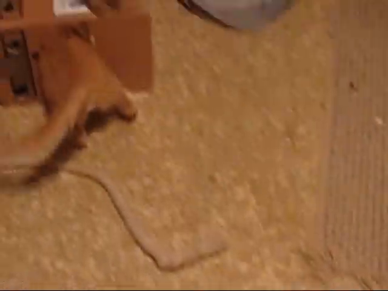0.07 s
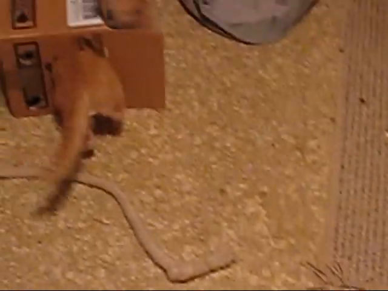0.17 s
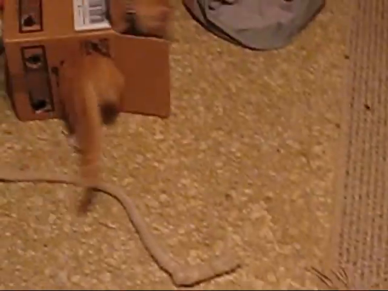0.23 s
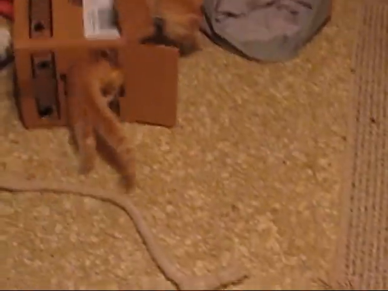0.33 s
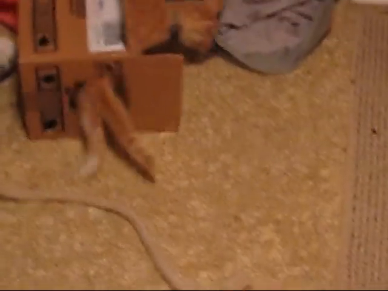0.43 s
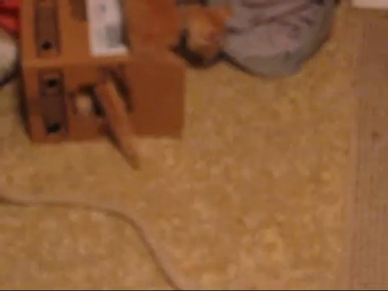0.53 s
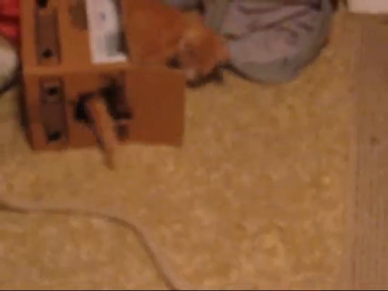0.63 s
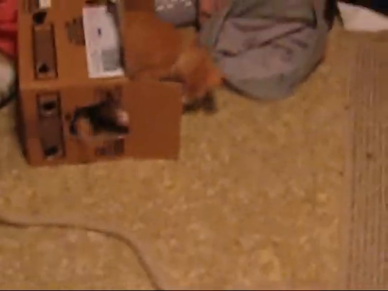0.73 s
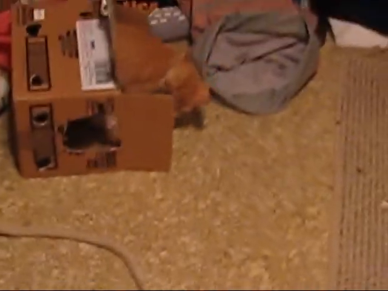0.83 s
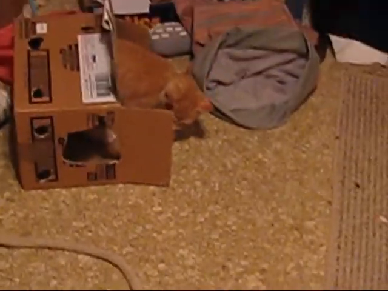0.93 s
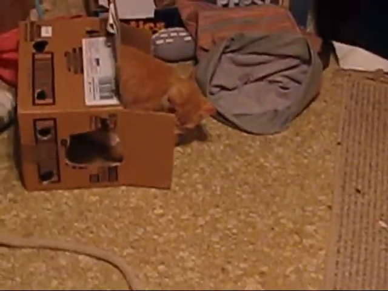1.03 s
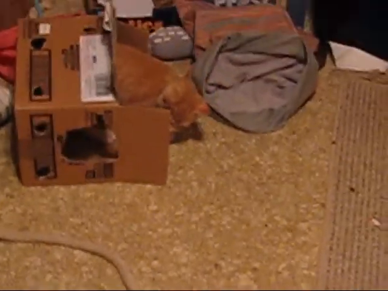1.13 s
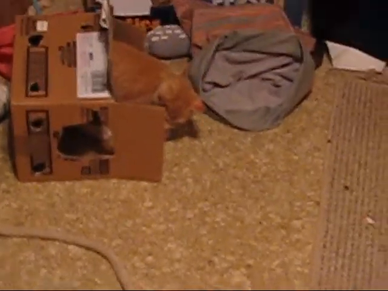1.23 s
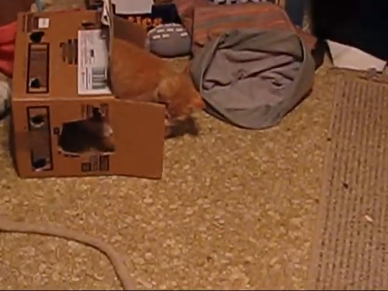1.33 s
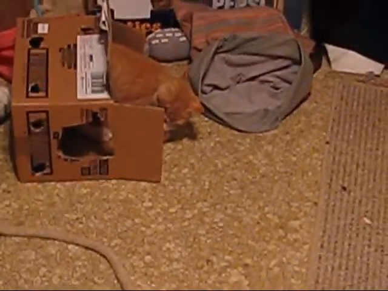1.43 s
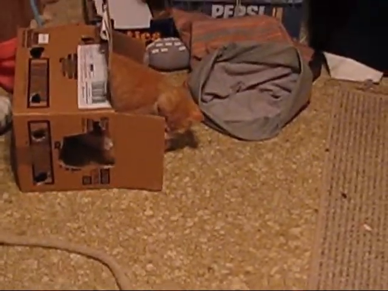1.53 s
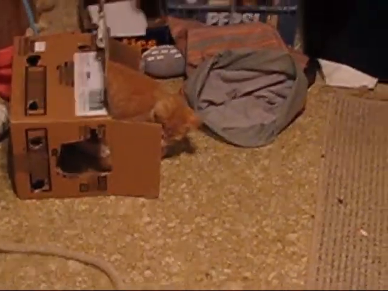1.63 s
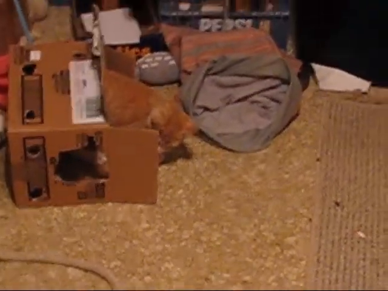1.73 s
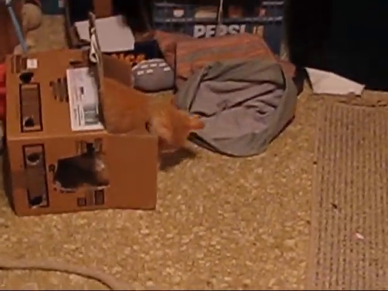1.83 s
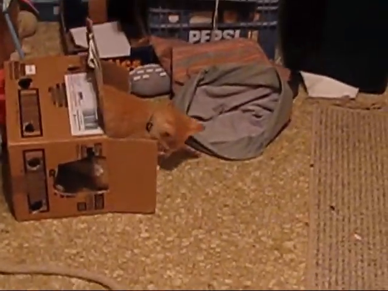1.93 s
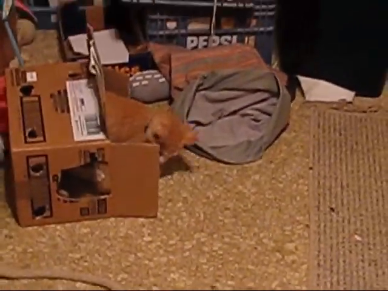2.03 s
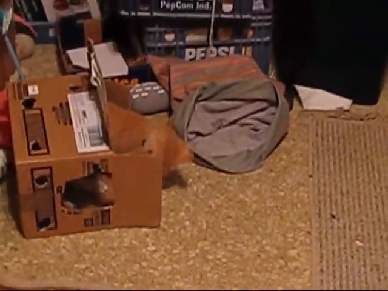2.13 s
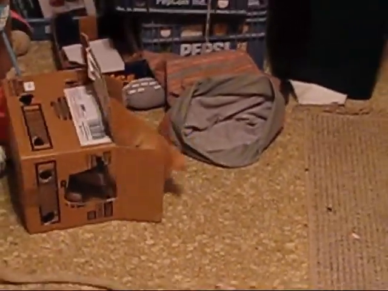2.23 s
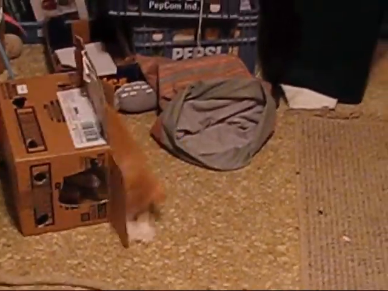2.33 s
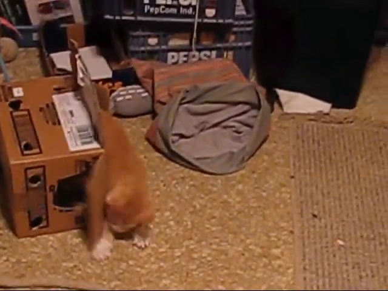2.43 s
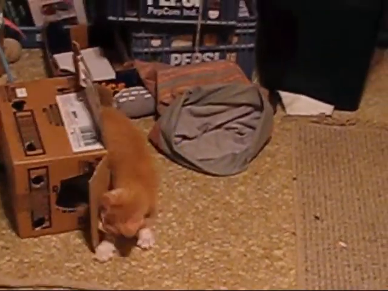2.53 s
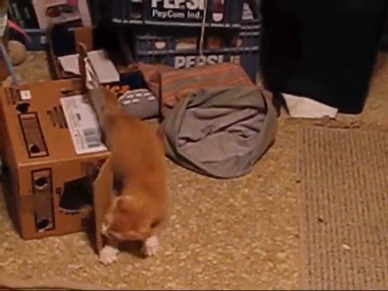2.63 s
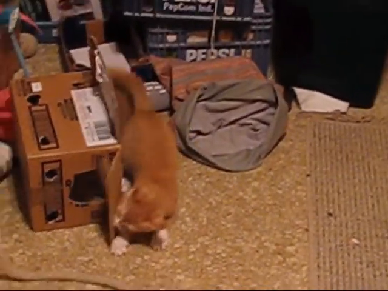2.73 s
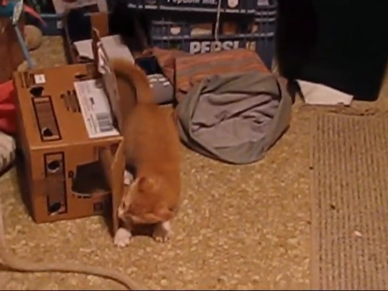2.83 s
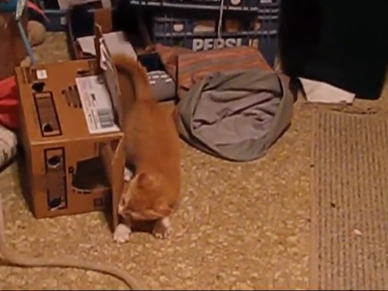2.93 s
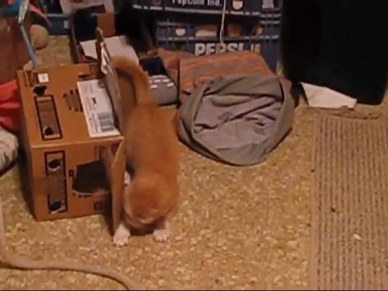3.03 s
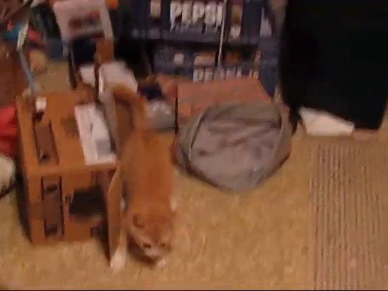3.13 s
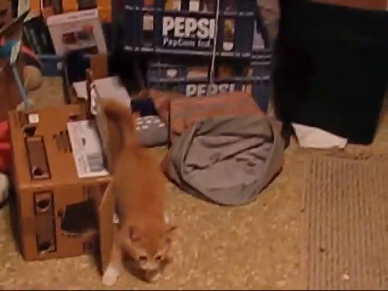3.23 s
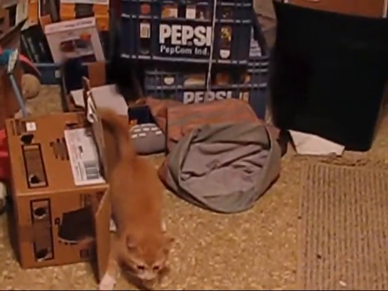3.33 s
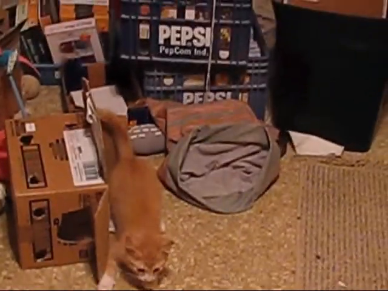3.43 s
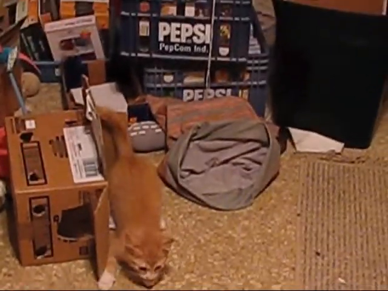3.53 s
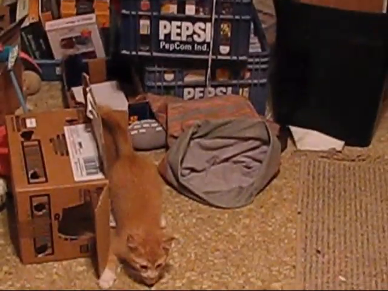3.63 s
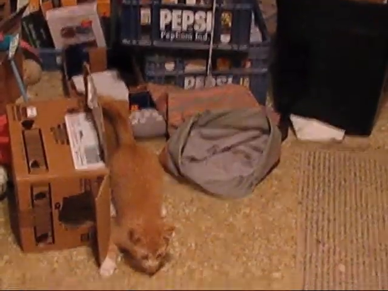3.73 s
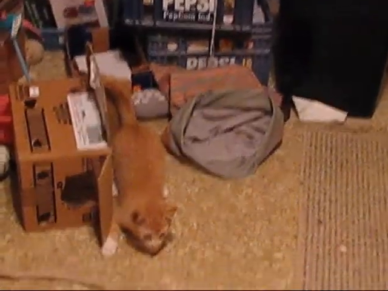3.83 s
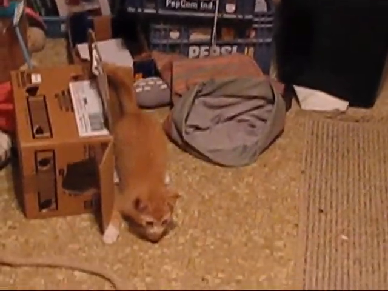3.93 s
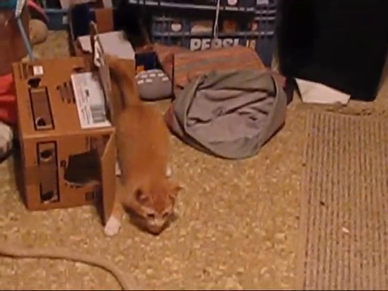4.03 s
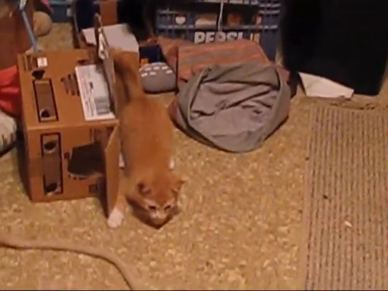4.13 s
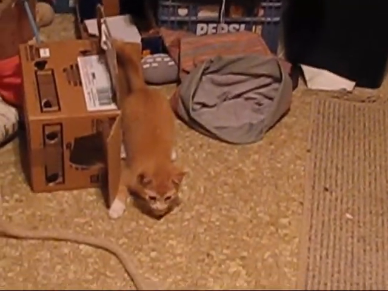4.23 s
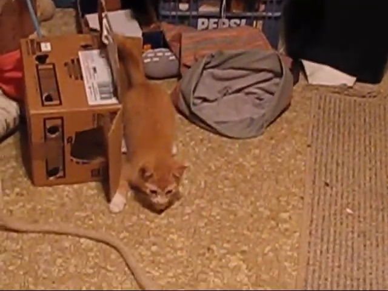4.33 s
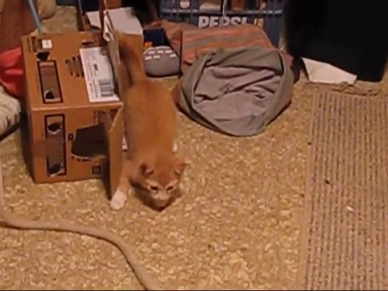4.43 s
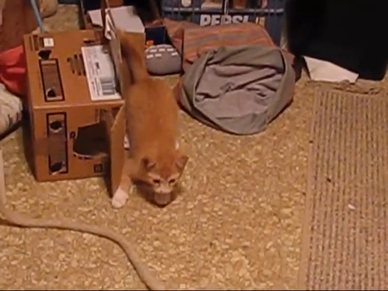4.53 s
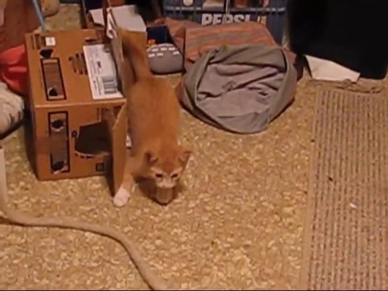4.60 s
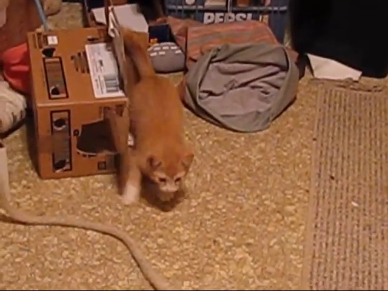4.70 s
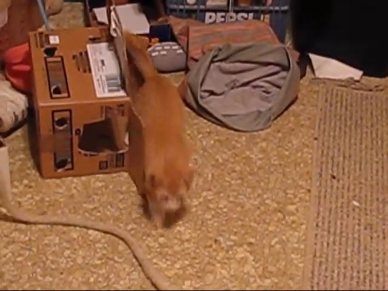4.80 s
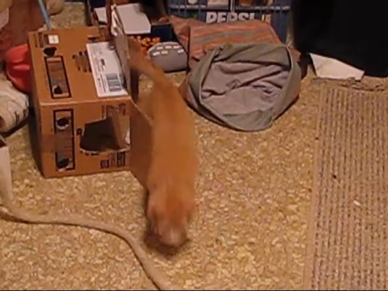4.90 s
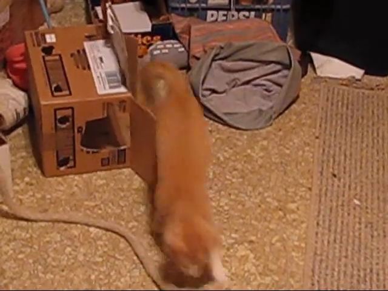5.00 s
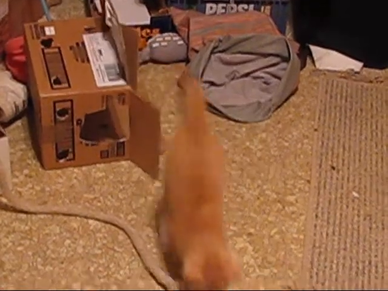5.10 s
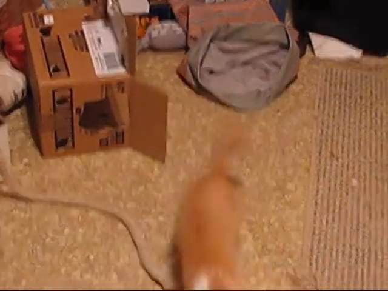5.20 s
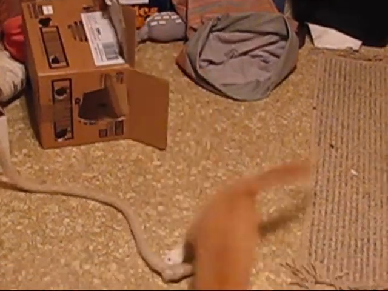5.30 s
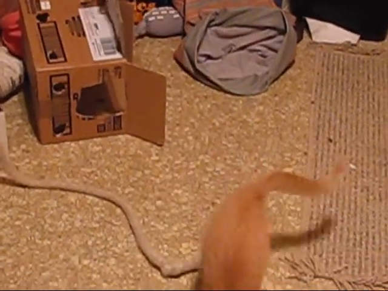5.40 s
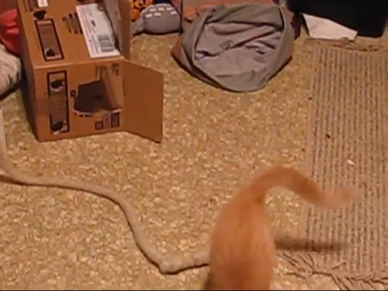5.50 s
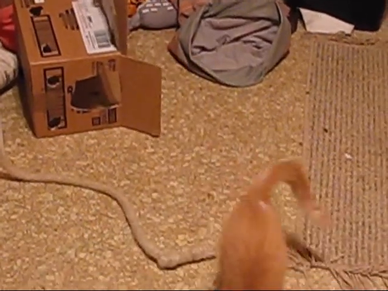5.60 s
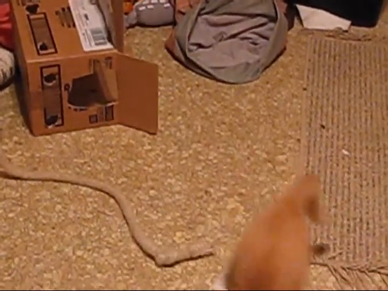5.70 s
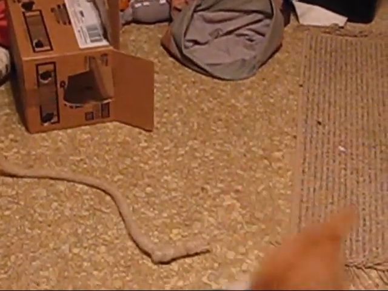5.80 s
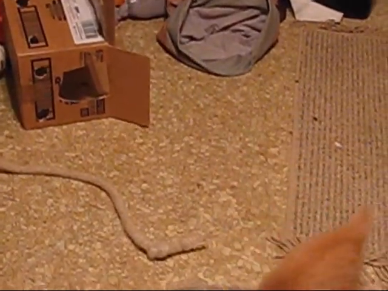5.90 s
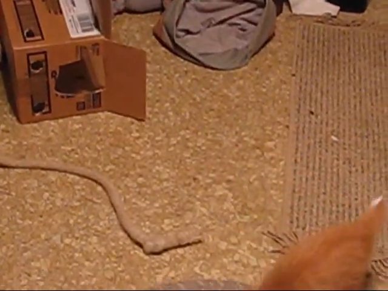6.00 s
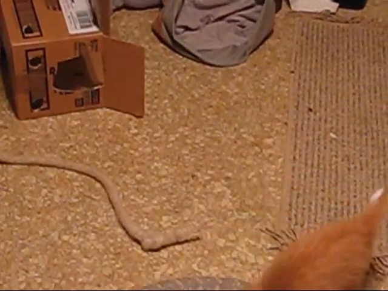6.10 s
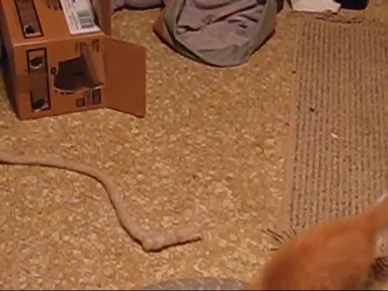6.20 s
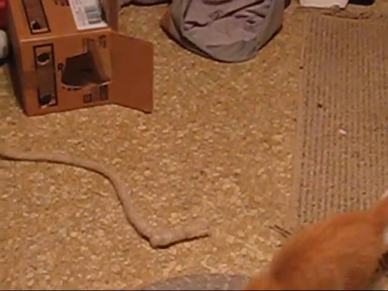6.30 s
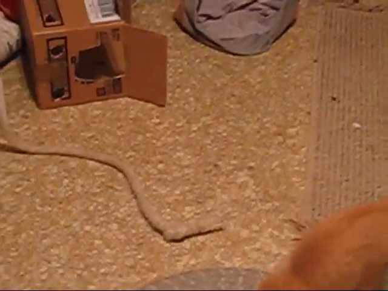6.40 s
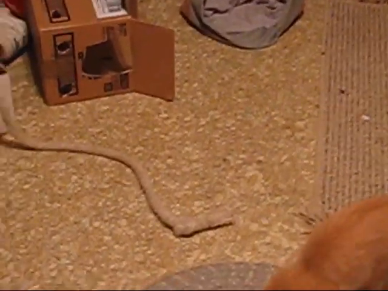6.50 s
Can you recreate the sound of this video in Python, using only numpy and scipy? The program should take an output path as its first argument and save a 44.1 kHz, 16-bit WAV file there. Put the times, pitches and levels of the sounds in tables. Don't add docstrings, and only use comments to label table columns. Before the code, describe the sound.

Close by, a kitten scrambles through a cardboard box: rough fur rubbing, scratching claws and hollow thumps. It quietens to faint ticks and taps, then the flap gives one very loud, sharp crack, followed by scrapes and snaps. After a lull with tiny steps, a light push-off and pounce set a small bell clinking weakly. A low motor hum and soft hiss continue throughout in a small, carpeted room, picked up by a simple camera microphone.

```python
import sys
import numpy as np
from scipy import signal
from scipy.fft import irfft
from scipy.io import wavfile
from scipy.ndimage import uniform_filter1d

SR = 44100
rng = np.random.default_rng(int(sys.argv[2]) if len(sys.argv) > 2 else 0)


def voltage_ratio(decibels):
    exponent = np.asarray(decibels, float) / 20
    return 10 ** exponent


def store_pcm(level_fs):
    pcm = np.round(np.clip(level_fs, -1, 1) * 32767).astype(np.int16)
    wavfile.write(sys.argv[1], SR, np.atleast_2d(pcm).T)


N = 288855
TIME = np.arange(N) / SR
BRIEF = np.arange(8000) / SR


def evened(x):
    return x / np.sqrt(np.mean(x ** 2) + 1e-20)


def peaked(x):
    return x / (abs(x).max() + 1e-12)


def sine(turns):
    return np.sin(2 * np.pi * turns)


def sides(pan_db):
    return voltage_ratio(np.array([[.5], [-.5]]) * pan_db)


def read(points, hz):
    f, value = np.transpose(points)
    return np.interp(np.log(hz + 1), np.log(f + 1), value)


def band(x, lo_hz, hi_hz, order=2):
    return signal.sosfilt(signal.butter(order, [lo_hz, hi_hz], "band", fs=SR, output="sos"), x)


def add(mix, s, sound, pan_db):
    part = mix[:, round(s * SR):][:, :len(sound)]
    part += sides(pan_db) * sound[:part.shape[1]]


def ring(modes, detune=0., size=8000):
    t = np.arange(size) / SR
    off = 1 + detune * rng.standard_normal(len(modes))
    return sum(voltage_ratio(db - 60 * t / t60) * sine(hz * k * t) for (hz, db, t60), k in zip(modes, off))


def slips(t60, spread_db, size=6000):
    uneven_db = spread_db * np.minimum(rng.exponential(1, size), 4) - 3.65 * spread_db
    run = rng.standard_normal(size) * voltage_ratio(uneven_db)
    run[0] = -1.57
    return run * voltage_ratio(-60 * np.arange(size) / SR / max(t60, .004))


# pitch_hz, level_db (per Hz)
AIR = [(12, -40), (24, -8.5), (130, -14), (330, -13), (730, -23), (1550, -24), (2900, -29), (12200, -40)]
# pitch_hz, coherence (0 to 1)
SAME = [(60, 0.24), (270, 0.53), (580, 0.85), (1230, 0.36), (2600, 0.0038), (5540, 0.9), (11800, 0.1)]
AIR_DB = -44.5


def air():
    frames, hz = N // 256 + 5, np.fft.rfftfreq(1024, 1 / SR)
    a, b, c, d, patches = rng.standard_normal((frames, 513, 5)).T
    patches = evened(uniform_filter1d(uniform_filter1d(patches, 12, 0), 14, 1))
    same = np.clip(read(SAME, hz), -1, 1)[:, None]
    left = a + 1j * b
    right = same * left + np.sqrt(1 - same ** 2) * (c + 1j * d)
    colour = voltage_ratio(read(AIR, hz)[:, None] + 1.3 * patches)
    hiss = signal.istft(np.array([left, right]) * colour, nperseg=1024, noverlap=768)[1][:, :N]
    return voltage_ratio(AIR_DB) * hiss / np.std(band(hiss, 265, 11000))


# start_s, level_db
HUM = [(0.0, -35.5), (1.26, -36.5), (2.1, -36.5), (2.44, -41), (2.74, -37.5), (5.07, -38.5), (5.27, -40.5),
       (6.55, -38)]
# multiple, level_db
HUM_ORDERS = [(2, -47.5), (4, -49), (8, -60.5), (15, -71), (22, -68.5), (24, -69), (26, -61.5), (28, -63.5),
              (30, -67.5), (32, -73), (40, -105)]
# pitch_hz, level_db, width_hz
FAN = [(91.5, -48, 0.54), (183.8, -44.5, 3.96), (257.5, -55, 4)]
HUM_HZ, HUM_PAN_DB_PER_ORDER = 58.97, 0.0834
WHINE_HZ, WHINE_DB, FLIPS_PER_S = 7867.1, -61.5, 29.97


def machines():
    turns = HUM_HZ * TIME
    hum = voltage_ratio(np.interp(TIME, *np.transpose(HUM))) * sine(turns)
    for k, db in HUM_ORDERS:
        hum = hum + voltage_ratio(db) * sides(k * HUM_PAN_DB_PER_ORDER) * sine(k * turns + rng.random())
    flips = np.clip(8 * np.sin(np.pi * (FLIPS_PER_S * TIME + 0.4)), -1, 1)
    whine = voltage_ratio(WHINE_DB) * flips * sine(WHINE_HZ * TIME)
    fan = np.zeros(N)
    for hz, db, width_hz in FAN:
        drift = np.cumsum(rng.standard_normal(N)) / np.sqrt(SR)
        fan += voltage_ratio(db) * np.sin(2 * np.pi * hz * TIME + np.sqrt(2 * np.pi * width_hz) * drift)
    return np.sqrt(2) * (hum + whine + fan)


# pitch_hz, level_db, width_hz
DUCT = [(75.4, -51.5, 29), (167, -55.5, 18), (217.3, -60, 4.1), (272.3, -57.5, 10.5)]


def duct():
    hz = np.fft.rfftfreq(N, 1 / SR)
    a, b = rng.standard_normal((len(hz), 2)).T
    noise = a + 1j * b
    return sum(voltage_ratio(db) * evened(irfft(noise / (1 + ((hz - f) / width) ** 2), N)) for f, db, width in DUCT)


# pitch_hz, level_db (per Hz)
FUR = [(300, -6), (900, -7.5), (1500, -5), (2400, -3), (3300, -12), (4500, -14.5), (7500, -18),
       (12500, -20.5)]
# pitch_hz, level_db
WALLS = [(325, -1.5), (410, 0.5), (490, -4), (600, -3.5), (700, -6.5), (830, -12), (970, -7), (1130, -18)]


def rubbing():
    clumps = evened(uniform_filter1d(rng.standard_normal(N), 260))
    burst_db = 2.9 * np.minimum(rng.exponential(1, N), 5) + 1.54 * clumps
    crackle = rng.standard_normal((2, N)) * voltage_ratio(burst_db)
    crackle[1] = .68 * crackle[0] + .73 * crackle[1]
    hz, _, z = signal.stft(crackle, SR, nperseg=512)
    patches = uniform_filter1d(rng.standard_normal(z.shape[1:]), size=8, axis=0)
    patches = evened(uniform_filter1d(patches, size=5, axis=1))
    colour = voltage_ratio(read(FUR, hz)[:, None] + 2.4 * patches)
    fur = signal.istft(z * colour, SR, nperseg=512)[1][:, :N]
    panels = ring([(hz, db, .05) for hz, db in WALLS], size=3000)
    body = evened(band(signal.oaconvolve(crackle, panels[None])[:, :N], 275, 1150))
    return evened(band(fur, 1000, 4400)), -evened(band(fur, 4400, 13000)), body


# start_s, level_db
SHIFTING = [
    [(0.0, -37), (0.338, -42.5), (0.536, -50), (0.762, -36), (1.0, -63)],
    [(1.04, -48.5), (1.57, -52.5), (1.8, -53)],
    [(2.25, -52), (2.486, -44.5), (2.616, -41), (2.768, -41), (2.85, -51)],
    [(4.85, -64), (5.028, -64), (5.186, -49), (5.322, -62), (5.7, -46.5)],
]
# middle_s, level_db, length_s, body_db
SWEEPS = [(0.038, -47.5, 0.13, 6.5), (0.109, -39, 0.024, -24), (0.194, -51, 0.081, -8),
          (0.268, -47.5, 0.044, -22), (0.316, -45, 0.04, -20), (0.386, -40.5, 0.11, 1),
          (0.773, -46.5, 0.063, -22), (0.919, -47.5, 0.084, 3.5), (2.3, -41, 0.084, -0.5),
          (2.346, -42.5, 0.053, 5), (2.524, -48, 0.046, -2), (2.579, -45.5, 0.065, -12),
          (3.16, -57, 0.21, 10), (4.963, -45, 0.039, 1), (5.008, -36.5, 0.051, -4),
          (5.054, -51.5, 0.043, -4), (5.62, -53, 0.02, -15)]
# middle_s, level_db, length_s, body_db
RUBS = [(0.436, -50.5, 0.066, 15), (0.528, -45, 0.058, 11), (1.265, -50.5, 0.042, 6),
        (2.423, -46.5, 0.099, -24), (2.656, -44, 0.069, -14), (2.695, -29.5, 0.037, -7.5),
        (2.744, -39, 0.03, -1), (4.893, -39.5, 0.057, -6), (5.318, -45.5, 0.024, 8.5),
        (5.356, -50, 0.055, -12)]
# middle_s, level_db, length_s, body_db
WISPS = [(0.605, -55, 0.019, -8), (0.879, -56, 0.019, -7), (1.663, -60, 0.074, 5), (4.813, -58, 0.021, -5),
         (5.103, -65, 0.067, 21)]
SWEEP_TREBLE_DB, RUB_TREBLE_DB, WISP_TREBLE_DB = 1, -8.5, 12


def brushing():
    mid, treble, body = rubbing()
    out = np.zeros((2, N))
    for bout in SHIFTING:
        s, db = np.transpose(bout)
        on = np.interp(TIME, [s[0] - .01, s[0], s[-1], s[-1] + 0.03], [0, 1, 1, 0])
        level = on * voltage_ratio(np.interp(TIME, s, db) - 15.5)
        out += level * (mid + voltage_ratio(9.0) * treble + voltage_ratio(5.0) * body)
    kinds = (SWEEPS, SWEEP_TREBLE_DB), (RUBS, RUB_TREBLE_DB), (WISPS, WISP_TREBLE_DB)
    for strokes, treble_db in kinds:
        for s, db, length, body_db in strokes:
            a, b = max(round((s - 0.45 * length) * SR), 0), round((s + 0.99 * length) * SR)
            swell = np.sin(np.pi * np.linspace(0, 1, b - a) ** 0.71)
            stroke = mid[:, a:b] + voltage_ratio(treble_db) * treble[:, a:b] + voltage_ratio(body_db) * body[:, a:b]
            out[:, a:b] += swell * voltage_ratio(db) * stroke
    return out


# start_s, peak_db, ring_hz, treble_db, t60_s
CLAWS = [(0.0344, -27.5, 1600, 1.5, 0.24), (0.1018, -15, 2300, 1, 0.021), (0.1824, -18.5, 5980, -5, 0.067),
         (0.307, -29.5, 2540, 5, 0.25), (0.348, -23, 1930, -20, 0.11), (0.424, -18.5, 2220, -1, 0.024),
         (0.508, -17.5, 2300, -2.5, 0.14), (0.527, -24, 1550, 4.5, 0.069), (0.542, -30, 2600, -20, 0.023),
         (0.7543, -27.5, 2090, 0, 0.07), (2.256, -29.5, 1660, 2.5, 0.045), (2.354, -32, 2200, 5, 0.037),
         (2.447, -22.5, 2010, -28, 0.041), (2.5612, -26, 2560, -17, 0.028), (2.5755, -23, 1940, -20, 0.058),
         (2.682, -17, 2120, -3, 0.042), (2.693, -21, 2830, 2, 0.085), (2.7356, -15.5, 2820, -2.5, 0.065),
         (2.741, -20, 2140, -25, 0.13), (4.8866, -51, 1430, -26, 0.054), (5.007, -25, 3100, 7, 0.048),
         (5.015, -24, 2830, -28, 0.088)]
# start_s, peak_db, ring_hz, treble_db
TICKS = [(0.37, -35, 2570, 11), (1.0846, -24.5, 2600, -42), (1.3, -29, 1930, -25), (1.3258, -33, 1870, -19),
         (1.3704, -33, 2350, -42), (1.394, -32, 1900, -22), (1.614, -32, 1690, -41),
         (1.6643, -27.5, 2020, -20), (1.6847, -48, 1870, -20), (1.7014, -51, 1900, -12),
         (1.719, -42, 2500, -15), (2.469, -30.5, 1930, 5.5), (3.217, -48, 1520, -9),
         (4.1733, -31, 2070, -25), (5.3054, -32, 2840, -2), (5.3168, -27, 1470, -6),
         (5.363, -35.5, 2510, -4), (5.365, -33, 1750, -19), (5.603, -36, 3500, -10), (5.623, -37, 1500, 9),
         (5.625, -30, 3000, -3), (5.638, -35, 3300, -10), (6.328, -34, 1770, -3)]
CLAW_PAN_DB = -2.5
TICK_T60_S, PAN_PER_TREBLE_DB = .014, 0.2663


def claws():
    out = np.zeros((2, N))
    catches = [(*row, CLAW_PAN_DB) for row in CLAWS]
    ticks = [(*row, TICK_T60_S, CLAW_PAN_DB + PAN_PER_TREBLE_DB * (row[-1] + 10)) for row in TICKS]
    for rows, ringing, width in ((catches, .9, .06), (ticks, 1.3, .1)):
        for s, db, hz, treble_db, t60, pan_db in rows:
            run = slips(t60, spread_db=5.0)
            resonance = peaked(band(run, (1 - width) * hz, (1 + width) * hz, order=1))
            card = peaked(band(run, 850, 5260, order=4)) + ringing * resonance
            scratch = peaked(card) - voltage_ratio(treble_db) * peaked(band(run, 5200, 12900))
            add(out, s + 0.001001, voltage_ratio(db) * scratch, pan_db)
    return out


# start_s, peak_db, pitch_hz, t60_s
BOOMS = [(0.099, -23.5, 182, 0.05), (0.421, -22, 197, 0.1), (0.537, -17.5, 194, 0.18),
         (0.594, -27, 125.6, 0.15), (2.329, -15, 181, 0.11)]


def booms():
    out = np.zeros((2, N))
    for s, db, hz, t60 in BOOMS:
        boom = np.minimum(BRIEF / 0.0029, 1) * ring([(hz, 0, t60), (0.83 * hz, -8, t60)])
        add(out, s, -voltage_ratio(db) * boom, 0)
    return out


# start_s, peak_db, ring_hz, pan_db
KNOCKS = [(0.104, -30, 440, 0), (0.426, -34, 390, 2), (0.428, -37, 371, -0.5), (0.51, -18.5, 288, -10),
          (0.526, -23.5, 405, -4), (0.601, -24.5, 326, -1), (0.606, -25, 337, -1), (0.793, -31.5, 330, -11),
          (0.906, -26, 292, -8), (1.086, -32, 277, -9), (1.325, -35, 327, -11), (1.372, -30.5, 343, -10),
          (1.4, -30, 330, -7), (1.615, -27, 329, 1), (1.69, -33, 330, -14.5), (2.332, -14, 300, -0.5),
          (2.342, -19, 482, 0), (2.345, -21, 796, 0), (2.362, -31, 403, -4), (2.444, -29, 407, -4),
          (5.348, -31, 416, -4), (6.459, -37, 310, -1)]
# start_s, peak_db, ring_hz, pan_db
TAPS = [(1.088, -31, 915, 8), (1.301, -31.5, 874, -17), (1.326, -48, 850, -4), (1.372, -27.5, 710, 12),
        (1.618, -30, 976, -19.5), (1.627, -36.5, 810, 13), (1.668, -31, 1030, -9), (1.688, -33, 905, -16),
        (1.701, -32, 816, 16), (1.722, -36.5, 1024, -16), (3.177, -46.5, 2050, -4), (3.216, -36, 1520, -10),
        (4.884, -26, 690, 5), (4.8861, -19, 969, 3), (5.259, -36.5, 1070, -17), (5.320, -33, 1250, -14),
        (5.616, -36, 1160, -10), (6.458, -40, 820, -10)]
# pitch_hz, level_db, t60_s
BOX = [(194, -31.5, 0.029), (463, -32, 0.011), (780, -22, 0.11), (969, 14, 0.031), (2310, -33, 0.22),
       (3000, -40.5, 0.17)]
KNOCK_T60_S, TAP_T60_S, PRESS_PER_DB = 0.066, 0.061, 0.3


def knocks():
    out = np.zeros((2, N))
    blows = [(*row, KNOCK_T60_S * max(0.5 - PRESS_PER_DB * (row[1] + 25), .3)) for row in KNOCKS]
    blows += [(*row, TAP_T60_S) for row in TAPS]
    for s, db, hz, pan_db, t60 in blows:
        neighbours = [(k * hz, -3, .8 * t60 / k ** .5) for k in (.55, .75, 1.25, 1.55, 1.9)]
        panels = ring([(hz, 0, t60)] + neighbours, .05) + voltage_ratio(-14) * ring(BOX, 0.067)
        blow = signal.oaconvolve(slips(0.22 * t60, spread_db=6.0, size=2000), panels)
        add(out, s + 0.00101, voltage_ratio(db) * peaked(band(blow, 0.5 * hz, 2.0 * hz)), pan_db)
    return out


# start_s, peak_db, pitch_hz, direction (of the push), pan_db
SNAPS = [(0.105, -19, 400, 1, 0), (0.4222, -13, 450, 1, -2), (0.5983, -14, 400, -1, 0),
         (1.0866, -25, 1800, -1, -6), (1.3277, -26, 800, 1, -6), (1.3719, -22, 2200, -1, -8),
         (1.6149, -21, 2400, 1, -10), (1.6285, -26, 900, 1, -8), (1.687, -27, 1300, 1, -10),
         (1.72, -23, 800, 1, -10), (2.6838, -15, 2200, 1, -4), (2.7378, -14, 2400, -1, -4),
         (3.1788, -31, 1500, 1, -5), (4.885, -25, 1500, 1, 0), (5.614, -23, 650, 1, -6),
         (6.459, -26, 480, -1, -6)]
SNAP_LOSS_DB_PER_TURN = 11


def snaps():
    out, t = np.zeros((2, N)), np.arange(2000) / SR
    for s, db, hz, way, pan_db in SNAPS:
        decay = voltage_ratio(db - SNAP_LOSS_DB_PER_TURN * (t * hz - .25))
        add(out, s, np.sign(way) * decay * sine(hz * t), pan_db)
    return out


# start_s, peak_db, pitch_hz, held_s, pan_db
WOBBLES = [(0.351, -29, 455, 0.03, -4), (0.4584, -16.5, 170.5, 0.027, 3), (2.67, -22.5, 416, 0.0036, 8),
           (2.677, -20, 400, 0.008, 4), (0.601, -26, 335, 0.0065, 0), (1.6647, -17, 880, 0.001, -10),
           (2.336, -11, 315, 0.0021, 0), (5.3172, -20, 1040, 0.0074, -7.5),
           (5.318, -26.5, 1316, 0.0055, -15)]


def wobbles():
    out, t = np.zeros((2, N)), BRIEF
    for s, db, hz, held, pan_db in WOBBLES:
        stopped = voltage_ratio(-5 * t / held - 16 * np.maximum(t - held, 0) * hz / 2)
        add(out, s, -voltage_ratio(db) * np.minimum(t * hz * 2, 1) * stopped * sine(hz * t), pan_db)
    return out


# start_s, peak_db, pitch_hz, t60_s, pan_db
RINGS = [(0.432, -27, 707, 0.056, -1), (0.442, -33, 1010, 0.082, 0), (0.53, -21, 645, 0.05, -1),
         (0.543, -30, 2430, .012, -3), (0.428, -23, 2400, 0.028, -7), (0.511, -23.5, 1226, 0.042, -2),
         (0.525, -29, 1570, 0.063, 0), (0.519, -20.5, 459, 0.15, 0.5), (0.603, -24, 445, 0.093, 0),
         (0.604, -28, 620, 0.081, 0), (1.6155, -29.5, 2600, 0.021, -12), (4.171, -41, 2220, 0.04, -3),
         (2.3275, -18.5, 2250, 0.026, -15), (2.385, -32, 258, 0.055, 0), (2.342, -25, 410, 0.045, 0),
         (2.351, -21, 530, 0.046, 0), (2.345, -31, 830, 0.05, -2), (2.347, -27, 3060, 0.044, -4),
         (2.358, -23, 817, 0.043, -3), (2.358, -18, 194, 0.11, 3), (2.683, -21, 2130, 0.057, -4),
         (2.683, -24, 3400, .04, -9), (2.696, -27, 2815, 0.1, -14), (2.698, -27, 3560, 0.099, -6),
         (2.697, -38, 2150, .07, -4), (2.705, -29, 1364, 0.11, -2), (2.738, -19.5, 2110, 0.099, -2),
         (2.739, -22, 2770, 0.037, -7), (2.739, -29, 1660, 0.091, 1), (2.738, -32, 3900, .05, 1),
         (4.889, -37, 2060, 0.033, -9), (4.896, -28, 976, 0.037, -4.5), (5.006, -29, 3220, 0.047, -13),
         (5.015, -30, 2820, 0.08, -9), (5.016, -26, 1660, 0.053, -2), (5.038, -37, 1780, .04, -3),
         (5.3172, -14, 640, 0.016, -8), (5.326, -37, 1020, 0.045, -10), (5.349, -37, 650, 0.035, -1),
         (5.625, -36, 2200, .015, -4)]
# start_s, peak_db, pitch_hz, t60_s, pan_db
MORE_RINGS = [(0.42, -28, 724, 0.12, 0), (0.421, -30, 955, 0.054, 0), (0.518, -24, 660, 0.045, 0),
              (0.599, -22, 101, .12, 0), (0.628, -28, 100, 0.11, 0), (0.622, -28, 412, .12, 0),
              (2.329, -17, 754, .04, -4), (2.331, -9.5, 377, 0.073, 0), (2.343, -27, 1050, .06, -2),
              (2.347, -20, 493, .05, 0), (2.683, -26, 1500, 0.026, 0), (2.7, -31, 1980, .03, -4),
              (2.704, -29, 2760, 0.036, -6), (2.71, -24, 1770, .05, -4), (2.7347, -21, 2620, .02, -4),
              (2.742, -20, 2680, 0.024, -5), (2.741, -23, 3180, .02, -4), (2.747, -28, 1645, 0.053, 0),
              (3.06, -32, 880, 0.018, -1), (3.136, -33, 1050, .015, -3), (3.178, -29, 1240, 0.017, -11),
              (3.188, -36, 1120, 0.032, -13), (3.2165, -32, 1020, 0.018, -8), (3.217, -39, 2350, .012, -3),
              (3.27, -36, 1100, .02, -2), (3.274, -36, 1700, .015, 0), (3.276, -42, 2400, .012, -2),
              (3.47, -37, 888, .02, 0)]
RING_RISE_TURNS = 1.5


def rings():
    out, t = np.zeros((2, N)), BRIEF
    for s, db, hz, t60, pan_db in RINGS + MORE_RINGS:
        rise = np.minimum(t * hz / RING_RISE_TURNS, 1)
        add(out, s, voltage_ratio(db - 60 * t / t60) * rise * sine(hz * t), pan_db)
    return out


# start_s, peak_db, crack_hz, t60_s
FLAP = [
    (2.3284, 3.5, 2500, .006),
]


def flap():
    out = np.zeros((2, N))
    push_samples = 18
    for s, db, hz, t60 in FLAP:
        push = np.pad(-np.linspace(0, 1, push_samples) ** 1.6, (0, 8000 - push_samples))
        crack = [(hz, -7.5, t60), (1.5 * hz, -18, t60), (1.95 * hz, -19, t60)]
        crack += [(3 * hz, -13, t60), (4 * hz, -13, t60)]
        thud = [(560, -10.5, .012), (330, -20, .012)]
        rebound = np.roll(ring(crack + thud), push_samples)
        panels = np.roll(peaked(ring(BOX)), 60)
        add(out, s, voltage_ratio(db) * (uniform_filter1d(push + rebound, size=4) + voltage_ratio(-21.0) * panels), 0)
    return out


# start_s, peak_db
BELL_HITS = [(5.129, -42), (5.1382, -32), (5.1479, -28), (5.257, -46), (5.2694, -44), (5.2862, -34.5),
             (5.3083, -36), (5.342, -33.5), (5.359, -40), (5.3852, -51), (5.416, -46), (5.9427, -45.5),
             (5.964, -53), (5.9874, -52), (6.0307, -57), (6.1644, -53), (6.1689, -53)]
# pitch_hz, level_db, t60_s
BELL = [(5287, -1, .15), (5329, 0, .16), (5395, -4, .09)]


def bell():
    out, t = np.zeros((2, N)), BRIEF
    gaps = np.diff([s for s, _ in BELL_HITS] + [N / SR])
    for (s, db), gap in zip(BELL_HITS, gaps):
        lags = (rng.uniform(2.3, 2.9), 0, rng.uniform(0, 6))
        shell = np.zeros(len(t))
        for (hz, mode_db, t60), lag in zip(BELL, lags):
            shell += voltage_ratio(mode_db - 60 * t / t60) * np.sin(2 * np.pi * hz * t + lag)
        stilled = voltage_ratio(-1500 * np.maximum(t - min(gap - .005, .045), 0))
        clink = peaked(band(slips(.022, spread_db=5, size=8000), 5050, 6200))
        add(out, s, voltage_ratio(db) * (peaked(shell) * stilled + voltage_ratio(-5.5) * clink), -7)
    return out


def room(x, t60=0.26):
    taps = np.zeros((2, 16000))
    at = np.arange(120, 15980, 20) + rng.integers(0, 20, (2, 793))
    np.put_along_axis(taps, at, rng.choice([-1., 1.], at.shape), 1)
    hz, t, z = signal.stft(taps, SR, nperseg=256)
    decay = voltage_ratio(-60 * t / (t60 * (1 + hz[:, None] / 3000) ** -.3))
    tail = signal.istft(z * decay, SR, nperseg=256)[1]
    return signal.fftconvolve(x.mean(0)[None], tail / np.linalg.norm(tail[0]), axes=1)[:, :N]


def scene():
    near = brushing() + claws() + booms() + knocks() + snaps() + wobbles() + rings() + flap() + bell()
    near = np.array([near[0], np.roll(near[1], shift=1)])
    return near + voltage_ratio(-13.0) * room(near) + sides(0.8) * machines() + air() + duct()


def within(spans):
    return uniform_filter1d(sum((TIME > a) * (TIME < b) * 1. for a, b in spans), 500)


def roll_off(x):
    return signal.sosfilt(signal.butter(12, 12370, fs=SR, output="sos"), x)


# start_s, end_s
WIDE = [(1.07, 1.1), (2.38, 2.46), (3.77, 3.85), (5.35, 5.38), (6.51, 6.55)]
# pitch_hz, level_db
KEPT = [(130, -8), (350, -5), (1300, -14), (4050, -30), (4150, 0), (5200, 0), (5330, -5), (5500, 5)]
# start_s, end_s
BASS_WIDE = [(.06, .13), (.26, .38), (.47, .53), (.95, 1.48), (1.55, 1.78), (3.18, 3.26), (5.05, 5.5),
             (5.57, 5.75), (6.38, 6.55)]
EARLY_EDGE_HZ, LATE_EDGE_HZ = 11750, 12200


def record(dry):
    total, difference = dry[0] + dry[1], dry[0] - dry[1]
    hz, t, (m, s) = signal.stft([total, difference], SR, nperseg=2048)
    edges = np.r_[0:40:4, 40:1024:8]
    m_power, s_power = [
        np.add.reduceat(uniform_filter1d(abs(z[:-1]) ** 2, size=2, axis=1), edges) for z in (m, s)]
    strong = s_power > m_power * voltage_ratio(2 * read(KEPT, hz[edges + 2]))[:, None]
    strong = np.repeat(strong, np.diff(np.r_[edges, 1024]), axis=0)
    kept = np.pad(strong, ((0, 1), (0, 0))) | (np.interp(t, TIME, within(WIDE)) > .9)
    kept = kept | (hz[:, None] < 170) & (np.interp(t, TIME, within(BASS_WIDE)) > .9)
    mid, side = total / 2, signal.istft(s * kept, SR, nperseg=2048)[1][:N] / 2
    pair = np.array([mid + side, mid - side])
    early, late = [
        signal.oaconvolve(pair, signal.firwin(511, f, window=("kaiser", 9), fs=SR)[None], "same")
        for f in (EARLY_EDGE_HZ, LATE_EDGE_HZ)]
    pair = early + (late - early) * np.clip((TIME - 1.2) / 2.0, 0, 1) ** 2
    return roll_off(np.clip(pair, -1, 1))


dry = scene()
out = record(dry)
store_pcm(out)
```